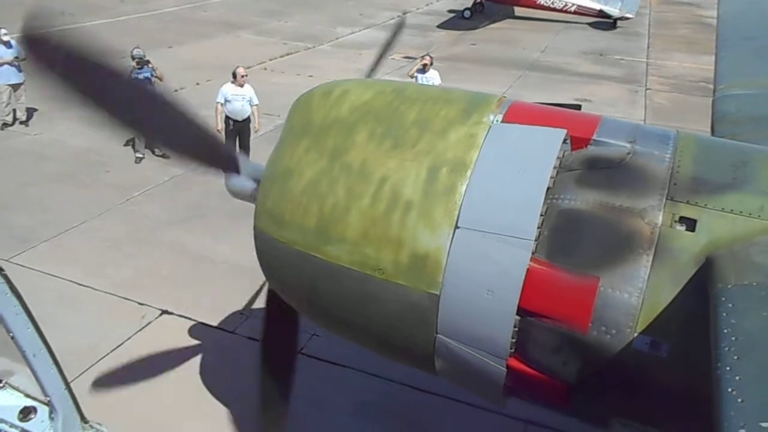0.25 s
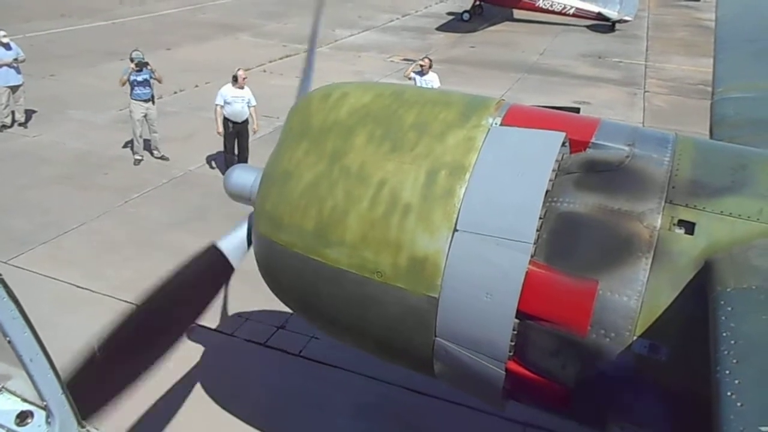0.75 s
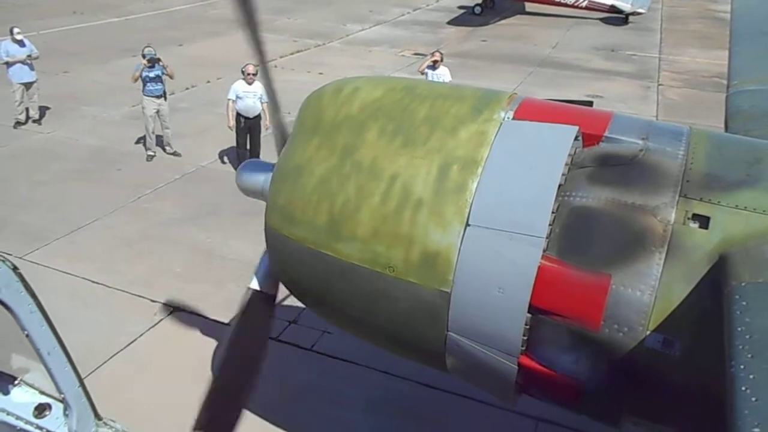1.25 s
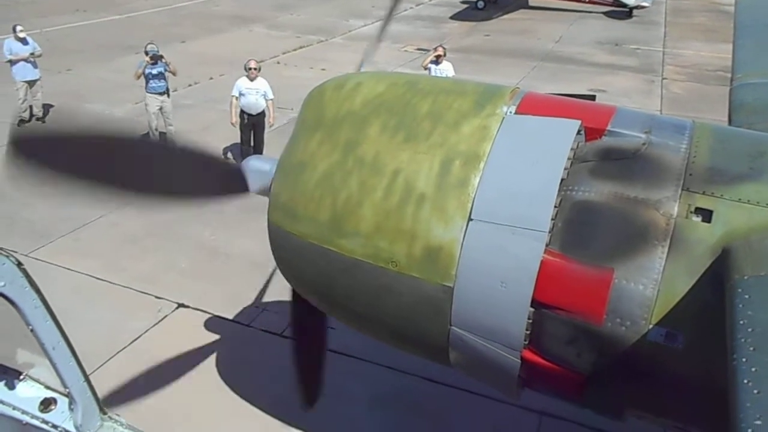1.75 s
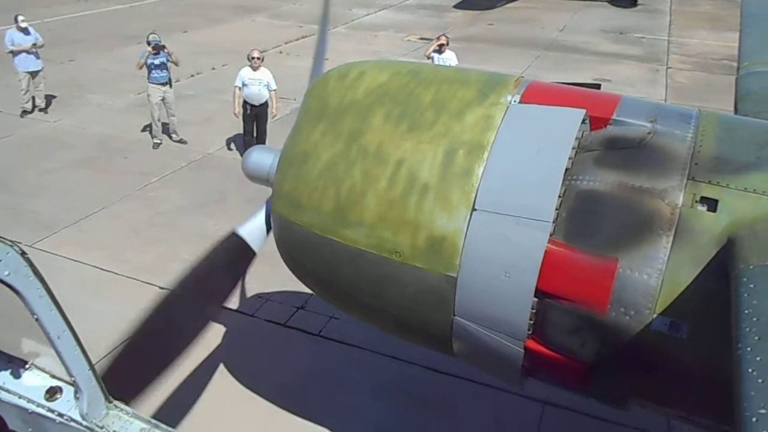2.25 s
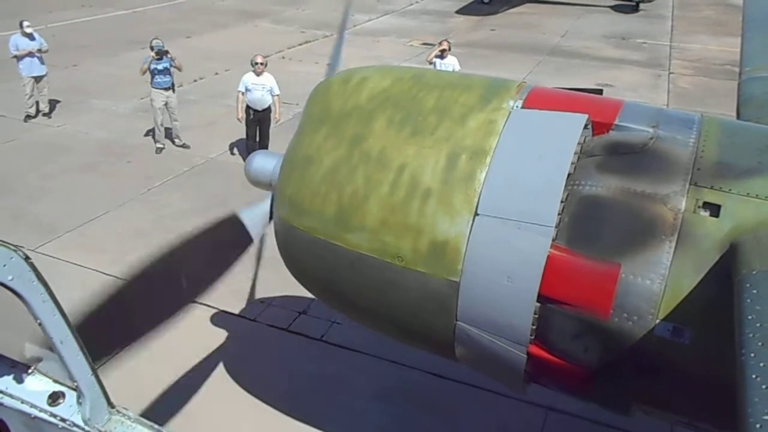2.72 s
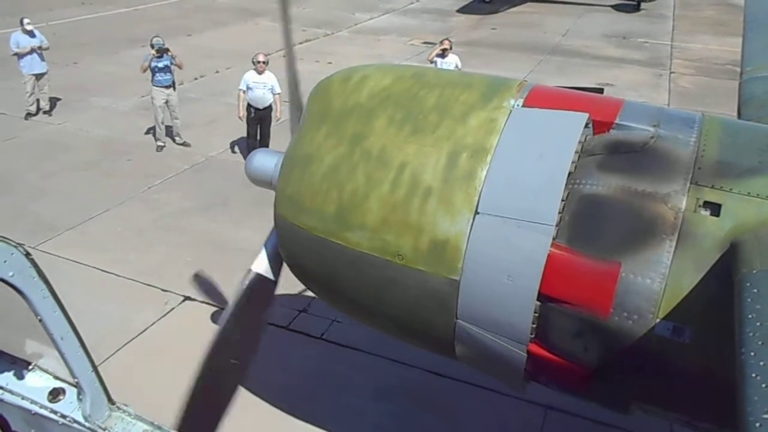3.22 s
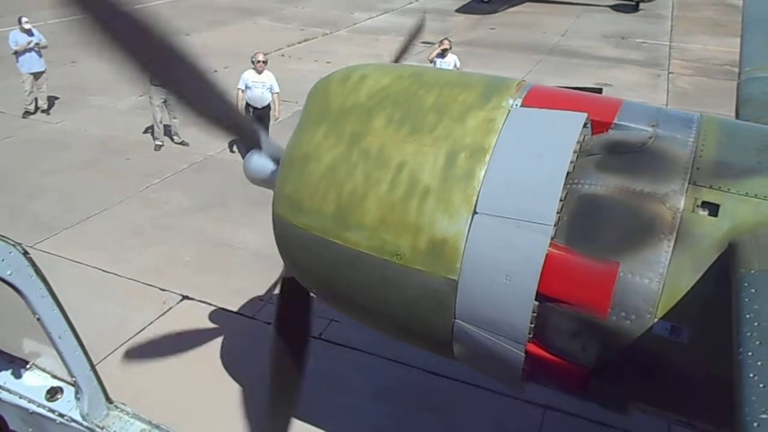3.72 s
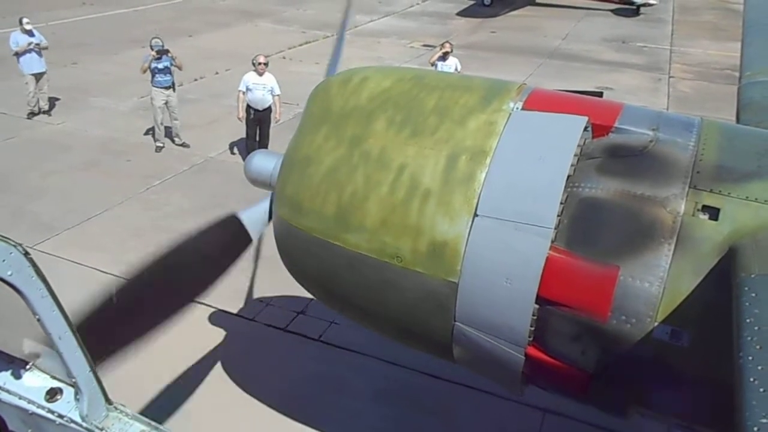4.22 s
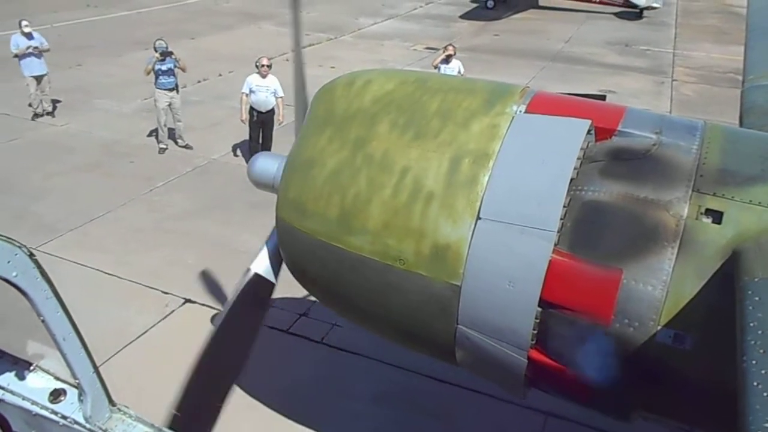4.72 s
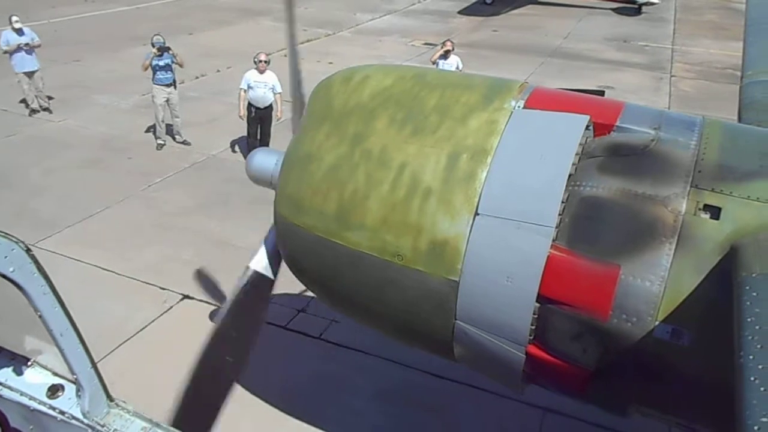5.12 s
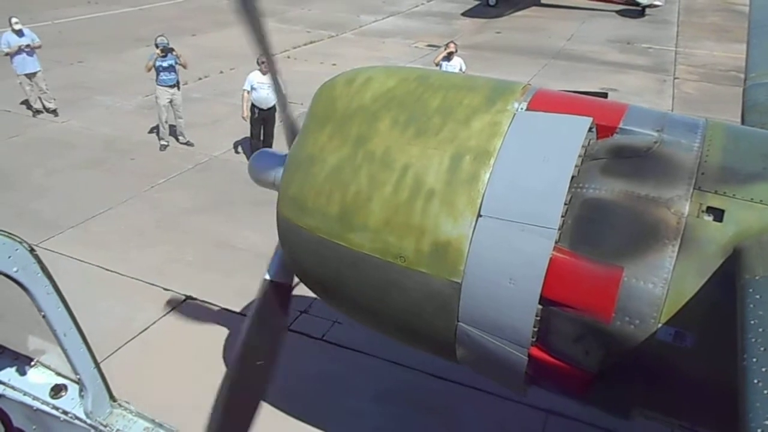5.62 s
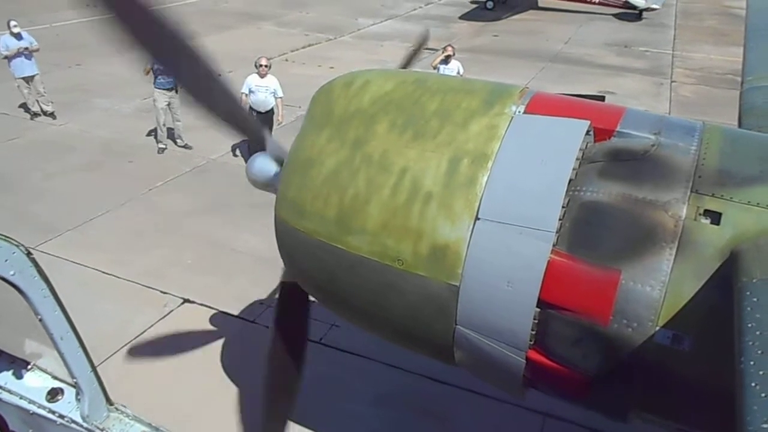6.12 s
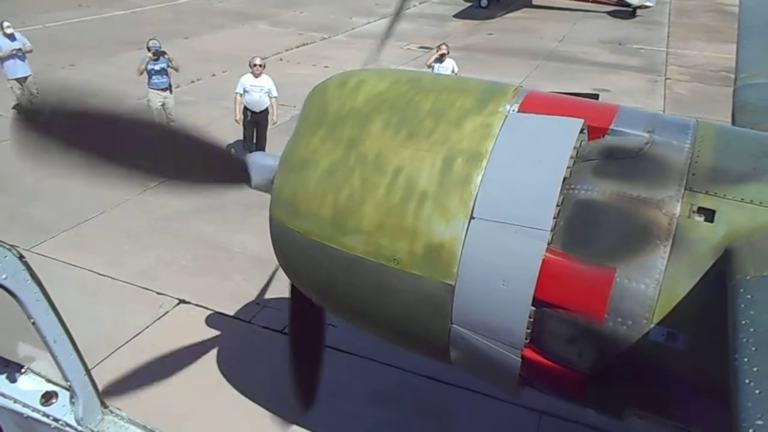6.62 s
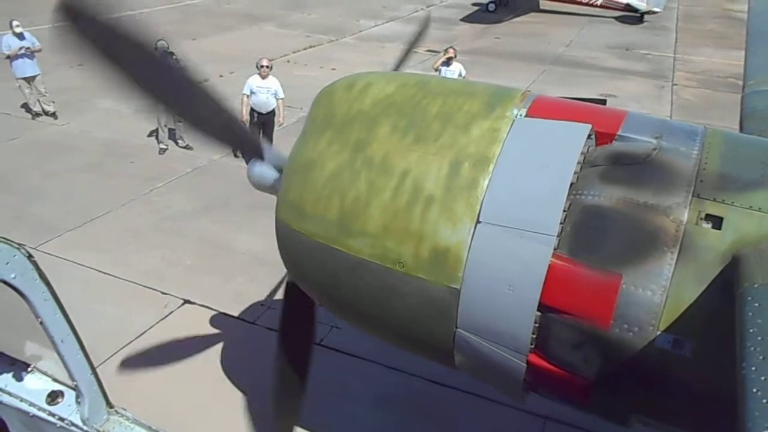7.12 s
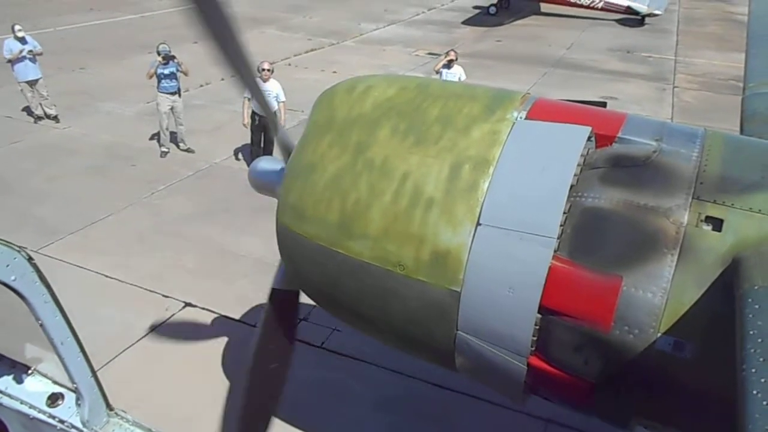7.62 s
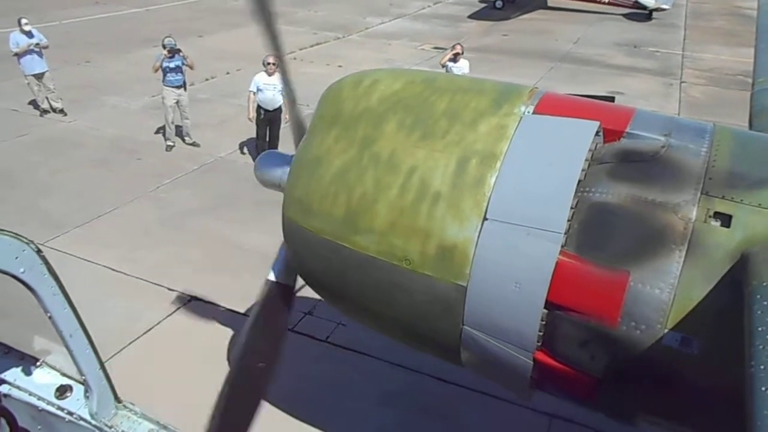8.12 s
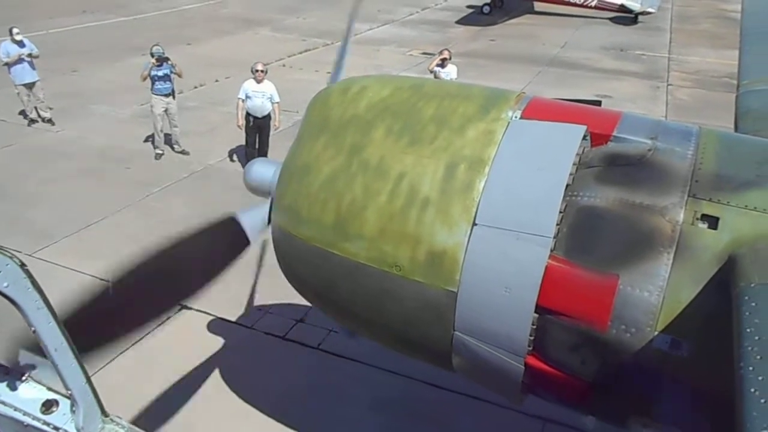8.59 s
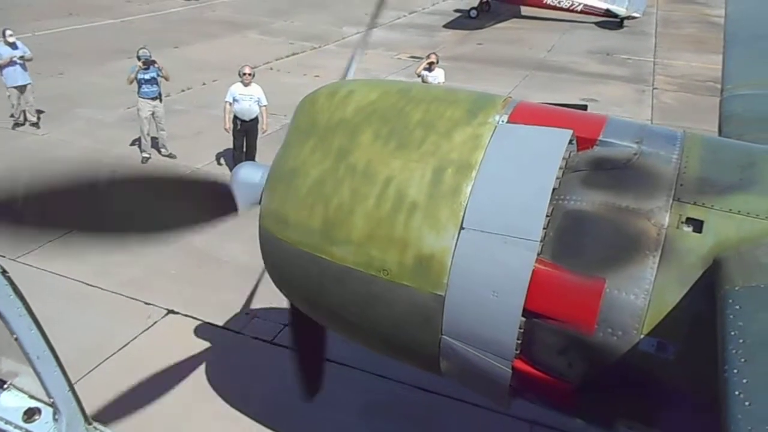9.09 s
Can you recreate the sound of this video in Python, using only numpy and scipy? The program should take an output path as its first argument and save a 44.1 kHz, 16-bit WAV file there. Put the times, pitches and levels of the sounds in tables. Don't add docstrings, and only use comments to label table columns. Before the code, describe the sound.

Continuous idle of a many-cylinder piston propeller engine, close and dry in open air. Each firing gives a dull push and a ringing pop; nearby stacks answer with raspy, sizzling bursts of varying brightness. Loose cowling rattles along, and airy wash and panel rumble fill the gaps. The rhythm gallops, stumbles on occasional misfires, and creeps faster late on, picked up by a modest handheld microphone.

```python
import sys
import numpy as np
from scipy import signal
from scipy.fft import rfft, irfft, next_fast_len
from scipy.io import wavfile
from scipy.ndimage import uniform_filter1d

SR = 44100
rng = np.random.default_rng(int(sys.argv[2]) if len(sys.argv) > 2 else 0)


def transcribe(signal):
    frames = np.atleast_2d(signal).T
    limited = np.clip(frames, -1, 1)
    pcm = np.round(limited * 32767).astype(np.int16)
    wavfile.write(sys.argv[1], SR, pcm)


def boost(x):
    u = np.asarray(x, float) / 20
    return 10 ** u


N = 412335


def evened(x):
    return x / np.sqrt(np.mean(x ** 2, axis=-1, keepdims=True) + 1e-20)


def read(points, hz):
    f, value = np.transpose(points)
    return np.interp(np.log(hz + 1), np.log(f + 1), value)


def ring(s, hz, width_hz):
    return 2 * np.pi * hz / ((s + np.pi * width_hz) ** 2 + (2 * np.pi * hz) ** 2)


def bass_cut(s):
    return (s / (s + 2 * np.pi * 16.6)) ** 2


def struck(times, db, response):
    size, lead = next_fast_len(N + SR), SR // 2
    train = np.zeros(size)
    sample = np.round(times * SR).astype(int).ravel() + lead
    np.add.at(train, sample, (boost(db) * np.ones(times.shape)).ravel())
    s = 2j * np.pi * np.fft.rfftfreq(size, 1 / SR)
    return irfft(rfft(train) * response(s), size)[lead:lead + N] * SR


# [t/s, crank speed/rpm]
SPEED = [(0, 681.6), (.68, 690.6), (3.23, 694.4), (4.25, 692.2), (4.93, 697.2), (5.61, 711.6),
         (6.12, 702.4), (6.46, 710.4), (7.31, 735.0), (7.65, 723.6), (7.82, 747.1), (7.99, 717.4),
         (9.35, 738.9)]
START_CYCLE = .035


def firing_times(places):
    s = np.arange(-400, 9800) / 1000
    cycles = np.cumsum(np.interp(s, *np.transpose(SPEED))) / 120 / 1000
    cycles += START_CYCLE - np.interp(0, s, cycles)
    last = int(np.interp(N / SR, s, cycles))
    turns = np.arange(-1, last + 1)[:, None] + np.asarray(places)
    return np.interp(turns, cycles, s)


# [t/s, level/dB]
EFFORT = [(0, 2.6), (1, 1.9), (2, 1), (3, 1.3), (4, 1.75), (5, 0.78), (5.6, 2.2), (6.4, 0.84), (7.4, 1.4),
          (8.4, 2.5), (9.35, 1.9)]


def effort(times):
    return np.interp(times, *np.transpose(EFFORT))


# [t/s, drop level/dB]
MISFIRES = [
    (1.152, -29),
    (3.853, -18),
    (3.87, -9),
    (6.005, -26),
    (6.535, -22),
    (7.462, -19),
    (7.975, -26),
]
# [t/s, fizz level/dB, jet body level/dB]
UNEVEN = [(.008, 4.5, 0.5), (.229, -7, -2), (.735, 5, 6), (1.1, 4, 0.5), (1.199, -2, -6), (1.794, 2, 2.5),
          (1.95, -4.9, -1), (2.095, 4.5, 3.5), (2.218, -2, -4), (2.313, -5.5, -4), (2.412, 3, 0),
          (3.524, -5.2, -5), (3.623, 3, 3.5), (3.68, 2, 3), (5.063, -3, -4), (5.572, 2, 3),
          (5.618, -7, -5.9), (5.665, 1, 2), (5.787, 3.3, 3), (5.855, 3, 4.5), (5.884, 2.5, 5),
          (6.489, -5, -4), (6.803, 4, 0.5), (7.199, 3, 3), (8.092, -5, 0.5), (8.258, -9, 1.5),
          (8.474, -7, -3), (8.573, 6, 3), (8.617, 1.5, 3.5), (9.175, 4.5, 0.5)]
POP_PER_DROP, POP_PER_BODY = 0.38, 0.42


def oddness(times, reach_s=.012):
    missed = [(s, db, db, POP_PER_DROP * db) for s, db in MISFIRES]
    uneven = [(s, fizz_db, body_db, POP_PER_BODY * body_db) for s, fizz_db, body_db in UNEVEN]
    odd = np.array(missed + uneven)
    gap = abs(times[..., None] - odd[:, 0])
    return np.where(gap.min(-1)[..., None] < reach_s, odd[gap.argmin(-1), 1:], 0)


# [place in the cycle/0-1, slow push level/dB, manifold boom level/dB]
PUSHES = [(0.0165, -34.1, -4.8), (0.1121, -59.3, -2.1), (0.198, -38.7, 1.4), (0.2665, -35.4, 0.7),
          (0.3231, -32.3, 0.2), (0.4117, -74.0, -0.8), (0.4394, -34.8, -30.5), (0.5159, -34.7, -1.2),
          (0.5831, -36.2, -8.2), (0.6226, -32.8, -10.1), (0.7044, -45.4, -0.1), (0.7631, -36.4, 2.5),
          (0.9081, -36.6, 7.0), (0.9714, -74.0, -2.1)]
PUSH_DB_PER_RPM, IDLE_RPM = 0.0161, 698


def pushes(uneven_db=.6, jitter_s=.00019):
    place, push_db, boom_db = np.transpose(PUSHES)
    at = firing_times(place)
    late, strength = rng.standard_normal((2, *at.shape))
    burn_db = uneven_db * strength + 0.38 * oddness(at - .005)[..., 2] + effort(at)
    at = at + jitter_s * late
    speed_db = PUSH_DB_PER_RPM * (np.interp(at, *np.transpose(SPEED)) - IDLE_RPM)
    push = struck(at, push_db + burn_db + speed_db, lambda s: bass_cut(s) / (1 + s * .0045) ** 3)
    boom = struck(at, boom_db + burn_db, lambda s: bass_cut(s) * ring(s, 85.9, 81.6))
    return push + boom


# [place in the cycle/0-1, long pipe ring level/dB, short pipe ring level/dB]
POPS = [(.0381, -5.9, -30), (.081, -2, -27), (.2031, -12.2, -30), (.2754, -7.3, -22), (.3445, 1.5, -24),
        (.393, -11, -21), (.4745, -3.2, -27), (.5206, -1.8, -22), (.6356, -.2, -30), (.7029, -13.4, -30),
        (.7719, -7.5, -30), (.7939, -5.3, -6), (.9034, 3, -5.5)]


def pops(jitter_s=.00019):
    place, long_db, short_db = np.transpose(POPS)
    at = firing_times(place)
    late, strength = rng.standard_normal((2, *at.shape))
    odd_db = np.minimum(oddness(at - .002)[..., 2], 3)
    burn_db = 1.4 * np.clip(strength, -2, 1.3) + odd_db + effort(at)
    at = at + jitter_s * late
    long_pipe = struck(at, long_db + burn_db, lambda s: bass_cut(s) * ring(s, 295, 90) / (1 + s * .0006))
    short_pipe = struck(at, short_db + burn_db, lambda s: bass_cut(s) * ring(s, 360, 75) * 1.3)
    return long_pipe + short_pipe


KNOCK_AT = [.07, .338, .372, .506, .782, .812, .893, .925]
KNOCK_DB = [
    -11,
    -14.5,
    -19,
    -16,
    -19,
    -8,
    -21,
    -22,
]


def knocks():
    at = firing_times(KNOCK_AT)
    late, strength = rng.standard_normal((2, *at.shape))
    knock_db = KNOCK_DB + 2 * strength + oddness(at)[..., 2]
    return struck(at + 0.00039 * late, knock_db,
                  lambda s: ring(s, 616, 89) * ring(s, 563, 340) * 1500 * s / 4000)


def pressure(level_db=-15.3):
    return -boost(level_db) * (boost(-0.94) * pushes() + boost(0.3) * pops() + knocks())


VALVES = [.081, .239, .34, .514, .633, .793, .897]
OPEN_MS = [13.6, 17.8, 13.5, 15.9, 13.8, 13.8, 16]
COLOUR_HZ = [650, 1500, 3200, 5500, 8500]
STACKS = [
    (-10.5, -3.5, 4, 0.5, 6.5),
    (-6.5, -16, -6.5, 4.5, -9),
    (-1, -3.5, 3.5, 6, 9),
    (-2.5, -9, 8.5, 6, 2),
    (-10, -4, -3.5, 2.5, 3.5),
    (-3, -5, 1.5, 5.5, 5),
    (-4.5, -8.5, -6, 5, 0.5),
]
# [f/Hz, level/dB per Hz]
JET = [(290, 3), (500, -6.5), (629, 1.5), (825, -12), (1040, -2), (1290, -8), (1520, 0), (1790, -7),
       (3610, -6), (6730, -9), (8360, -4), (10200, -7.5), (11100, -26.5), (12000, -26.5), (12700, -85),
       (16500, -70), (22000, -120)]
JET_DB = -20.5


def stacks(lumpy_db=2.6, uneven_db=.7, flicker_db=1.3, size=2048):
    at = firing_times(VALVES)
    hz, t = np.fft.rfftfreq(size, 1 / SR), np.arange(size) / SR
    open_s = np.array(OPEN_MS)[:, None] / 1000
    colour_db = np.array([read(np.transpose([COLOUR_HZ, row]), hz) for row in STACKS])
    chance = np.clip(rng.standard_normal((*at.shape, 3)), -1.4, 1.4)
    odd = oddness(at)
    strength_db = JET_DB + effort(at) + uneven_db * chance[..., 0]

    re, im, lumps = rng.standard_normal((3, *at.shape, len(hz)))
    lumps = evened(uniform_filter1d(uniform_filter1d(lumps, size=9), size=9))
    lumps = boost(lumpy_db * np.clip(hz / 2500, 0, 1) * lumps)
    z = (re + 1j * im) * evened(lumps) * boost(read(JET, hz) + colour_db)
    z /= np.sqrt(np.mean(abs(z) ** 2) / size)

    lift = (1 - np.exp(-t / .0032)) ** 3
    shut = 1 / (1 + np.exp((t - open_s) / .0024))
    linger = (1 - np.exp(-t / .004)) * np.exp(-t / .016)
    fizz_flow = lift * shut + boost(-11) * linger
    body_flow = (t / .0088) ** 3 * np.exp(3 - 3 * t / .0088)

    fizzy = 1 / (1 + (6000 / (hz + 1)) ** 8)
    fizz = irfft(z * fizzy, size) * fizz_flow * boost(odd[..., :1] + chance[..., 1:2])
    body = irfft(z * (1 - fizzy), size) * body_flow * boost(odd[..., 1:2])
    gusts = evened(uniform_filter1d(rng.standard_normal(fizz.shape), size=70))
    blast = (fizz + body) * boost(strength_db[..., None] + flicker_db * gusts)
    blast *= signal.windows.tukey(size, .1)

    start = np.round((at + .0004 * chance[..., 2]) * SR).astype(int) + SR
    out = np.zeros(N + 2 * SR)
    np.add.at(out, (start[..., None] + np.arange(size)).ravel(), blast.ravel())
    return out[SR:SR + N]


# [f/Hz, level/dB per Hz]
WASH = [(8.8, -30), (15, -74), (91, -20), (180, 5), (259, -2), (848, -4), (1490, -6), (1920, -8),
        (3680, -7.5), (6840, -6), (8330, -16), (10100, -28), (12700, -67), (16500, -85), (22000, -120)]


def wash(level_db=-36, patchy_db=-1.5):
    frames, hz = N // 256 + 5, np.fft.rfftfreq(1024, 1 / SR)
    re, im, patches = rng.standard_normal((3, len(hz), frames))
    patches = uniform_filter1d(uniform_filter1d(patches, size=8, axis=0), size=8, axis=1)
    z = (re + 1j * im) * boost(read(WASH, hz)[:, None] + patchy_db * patches / patches.std())
    return boost(level_db) * evened(signal.istft(z, nperseg=1024, noverlap=768)[1][:N])


def scene():
    return (pressure() + stacks() + wash())[None]


def roll_off(x):
    return signal.sosfilt(signal.butter(12, 12870, fs=SR, output="sos"), x)


def record(dry):
    edge = signal.firwin(401, 12600, window=("kaiser", 9), fs=SR)
    mix = signal.oaconvolve(dry, edge[None], "same")
    return roll_off(mix)


dry = scene()
out = record(dry)
transcribe(out)
```